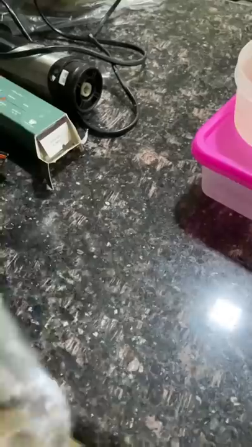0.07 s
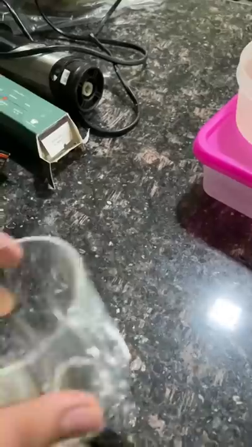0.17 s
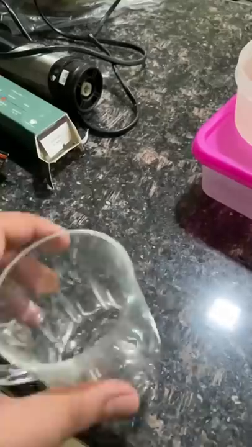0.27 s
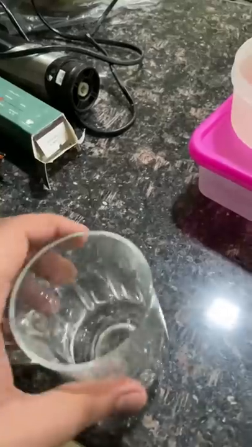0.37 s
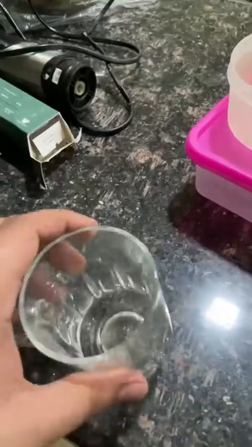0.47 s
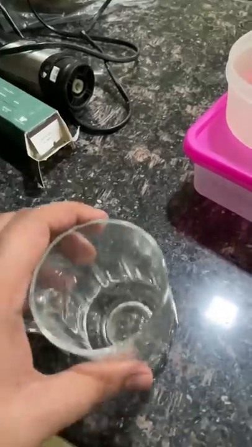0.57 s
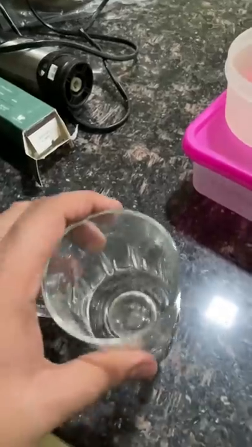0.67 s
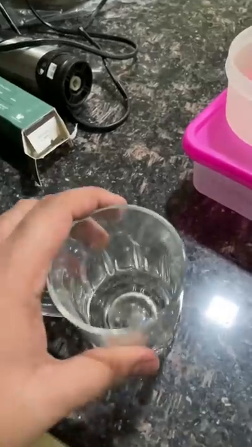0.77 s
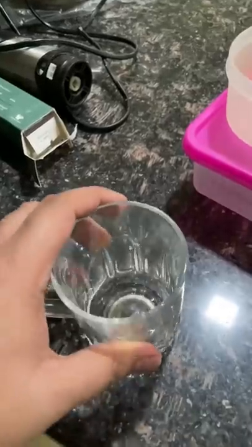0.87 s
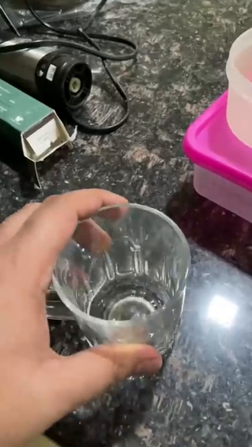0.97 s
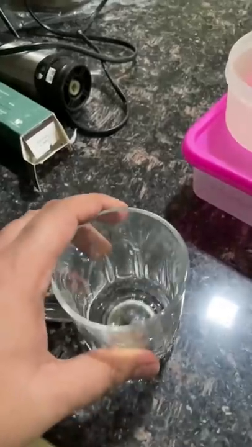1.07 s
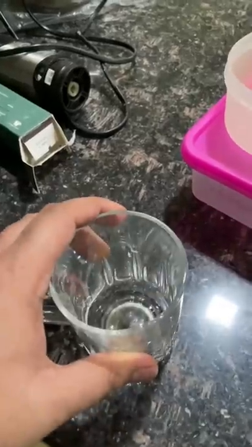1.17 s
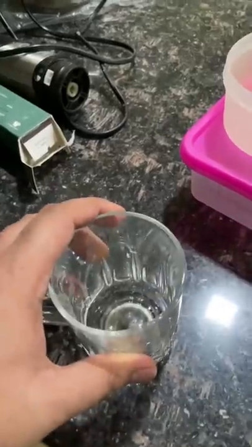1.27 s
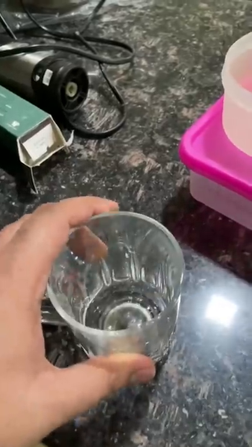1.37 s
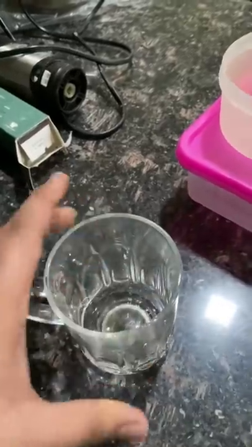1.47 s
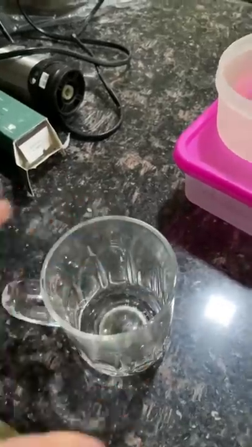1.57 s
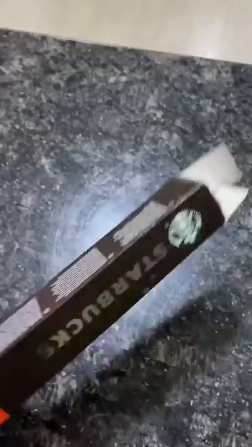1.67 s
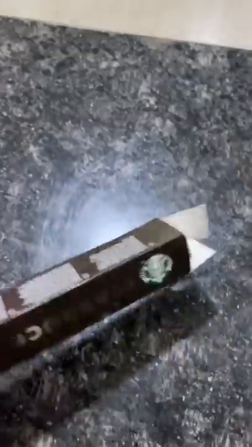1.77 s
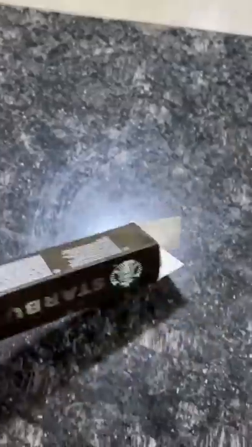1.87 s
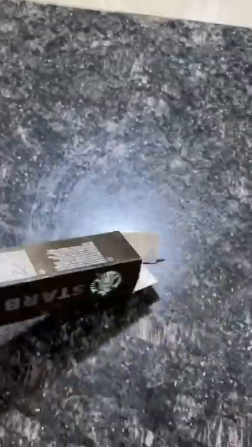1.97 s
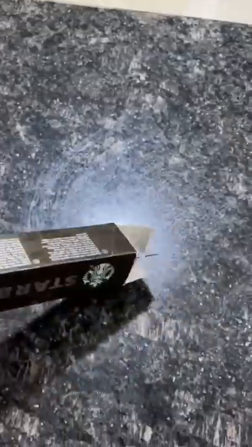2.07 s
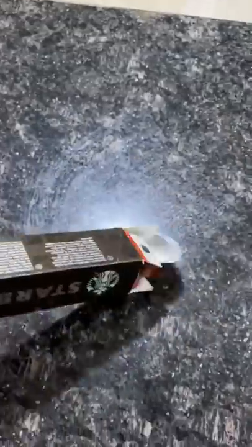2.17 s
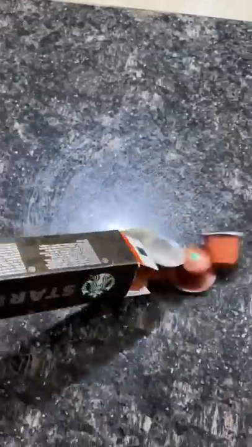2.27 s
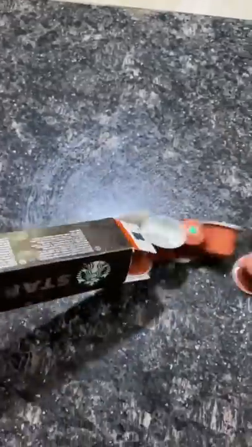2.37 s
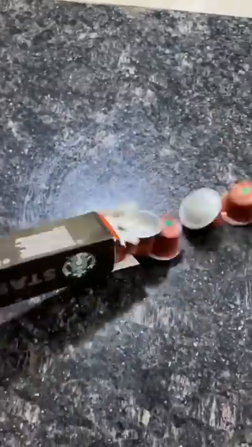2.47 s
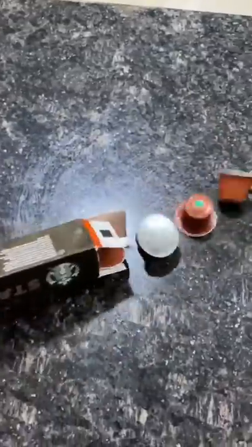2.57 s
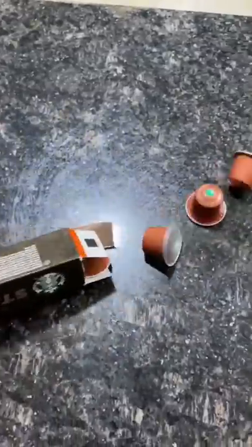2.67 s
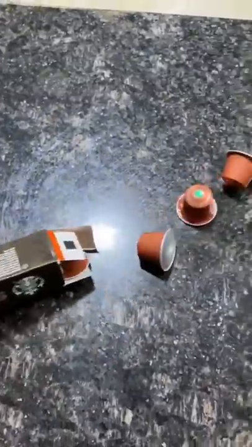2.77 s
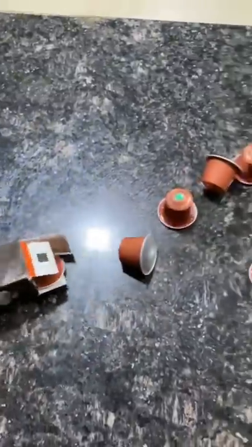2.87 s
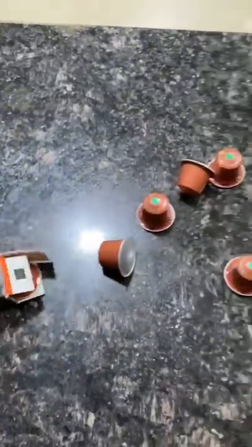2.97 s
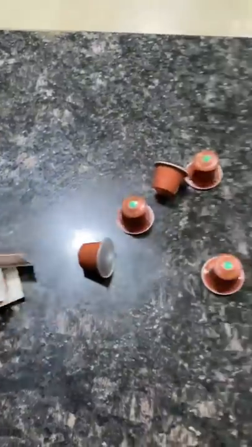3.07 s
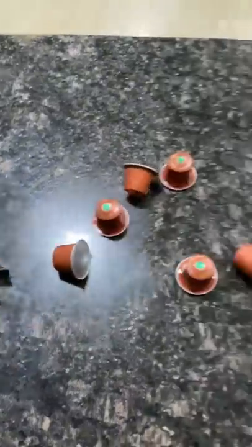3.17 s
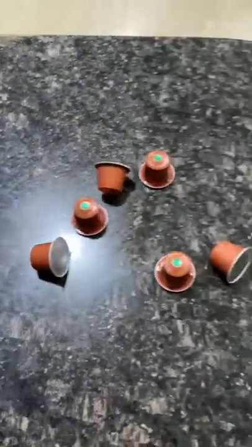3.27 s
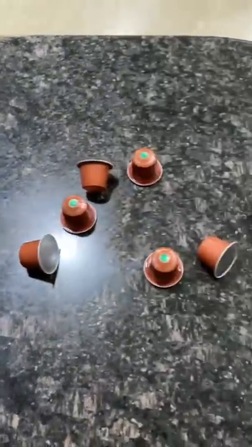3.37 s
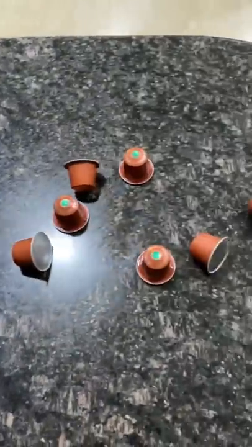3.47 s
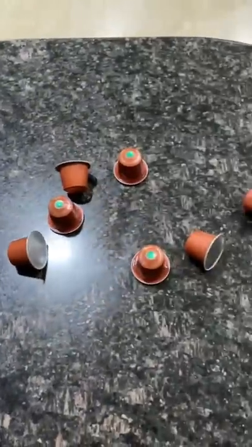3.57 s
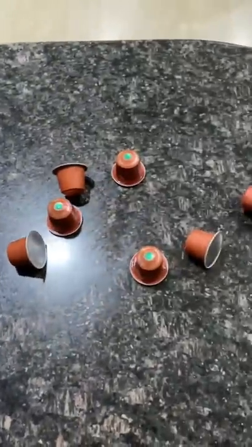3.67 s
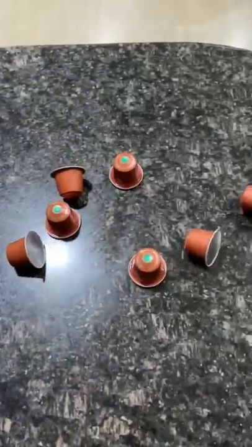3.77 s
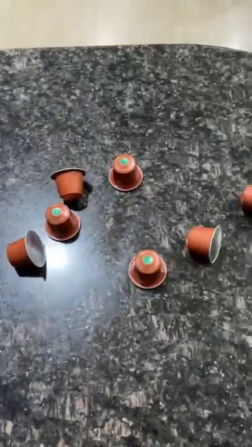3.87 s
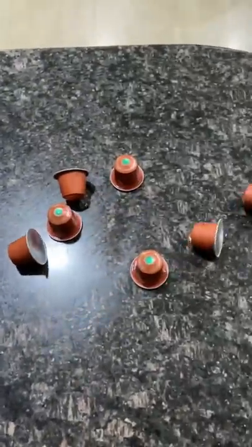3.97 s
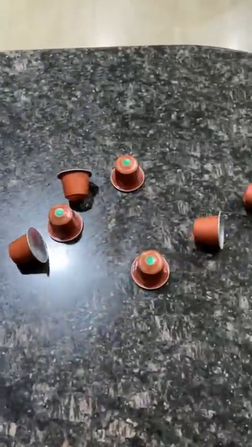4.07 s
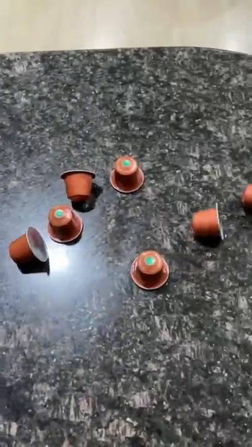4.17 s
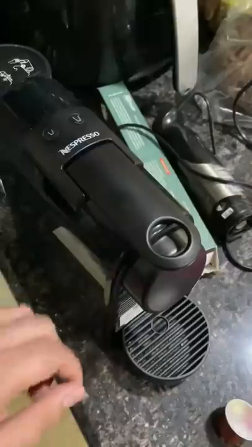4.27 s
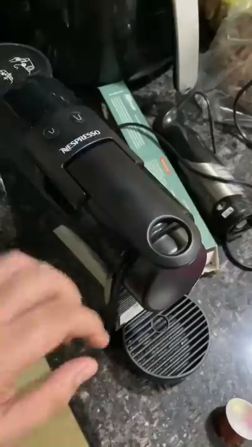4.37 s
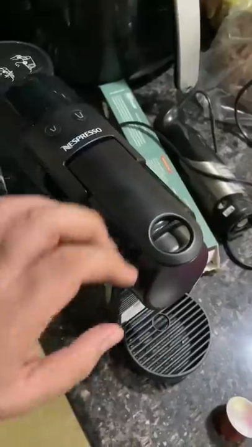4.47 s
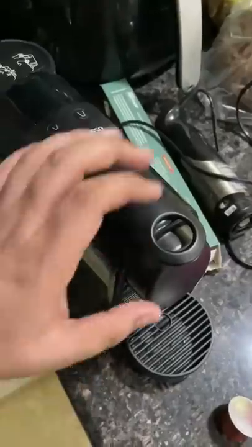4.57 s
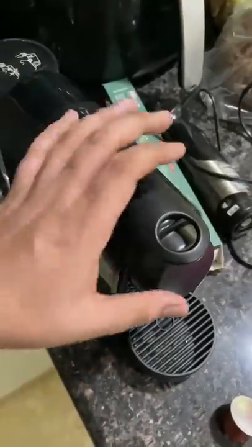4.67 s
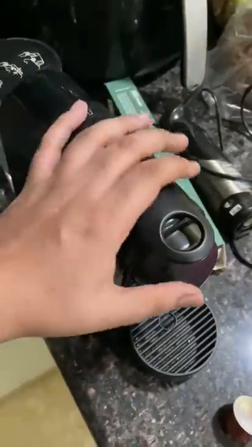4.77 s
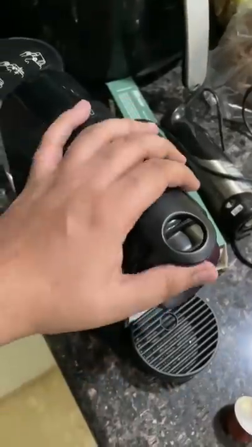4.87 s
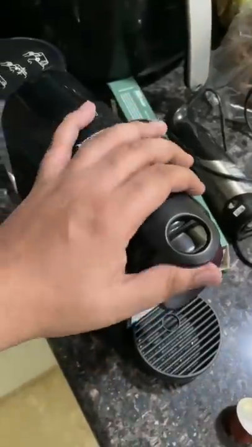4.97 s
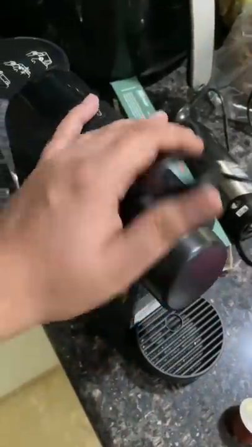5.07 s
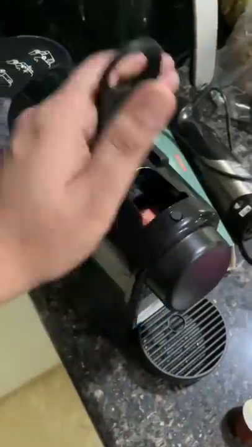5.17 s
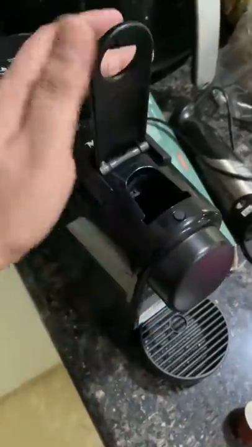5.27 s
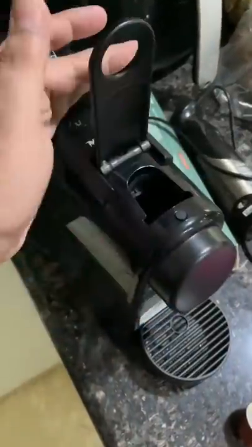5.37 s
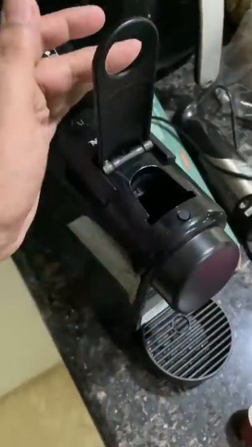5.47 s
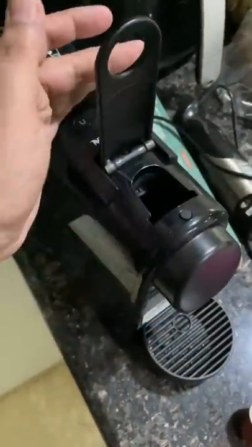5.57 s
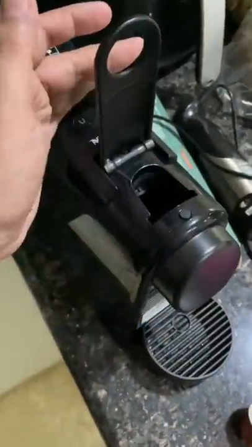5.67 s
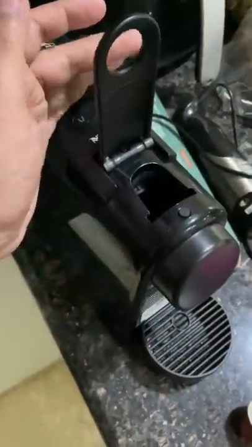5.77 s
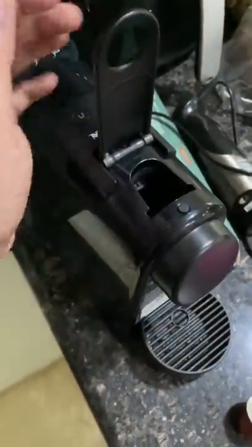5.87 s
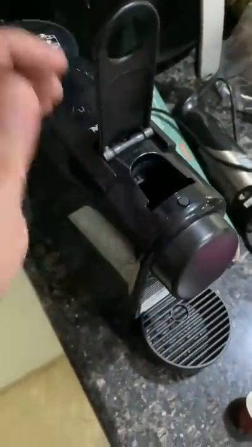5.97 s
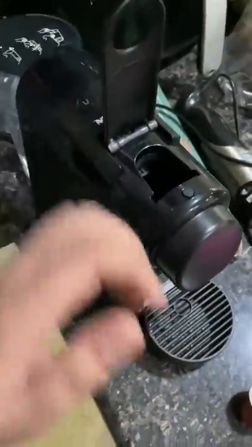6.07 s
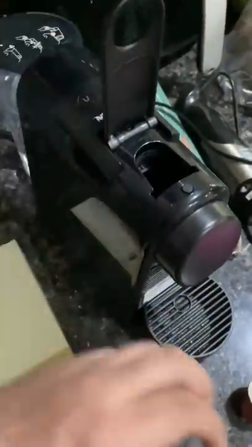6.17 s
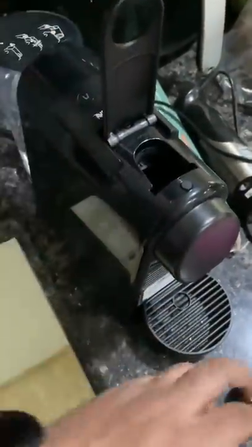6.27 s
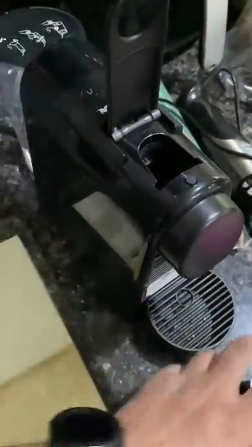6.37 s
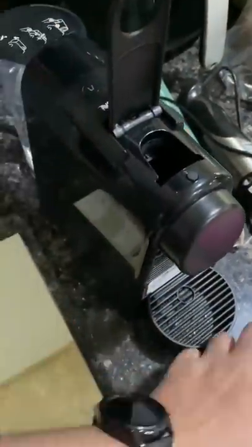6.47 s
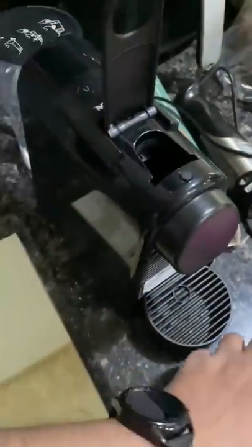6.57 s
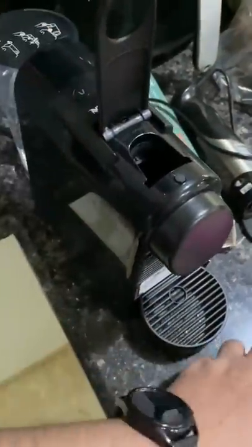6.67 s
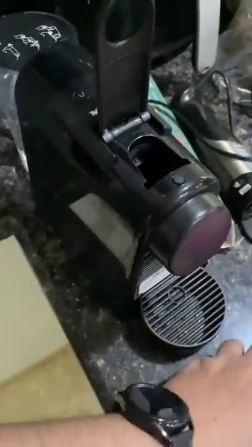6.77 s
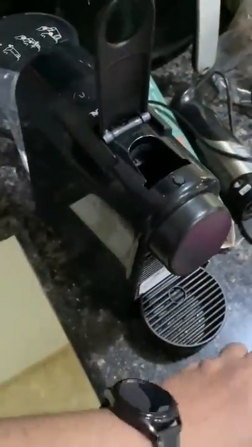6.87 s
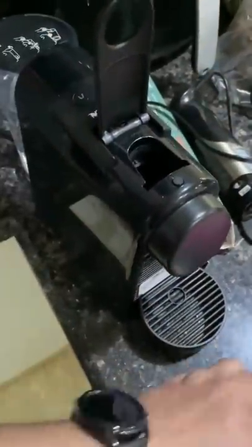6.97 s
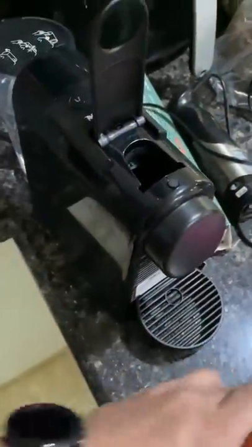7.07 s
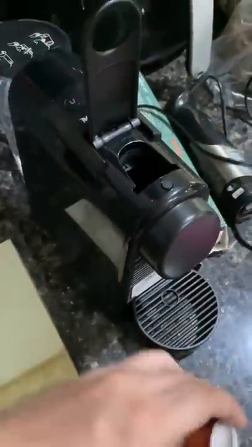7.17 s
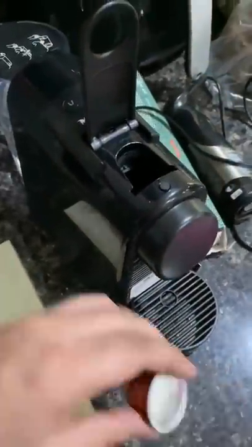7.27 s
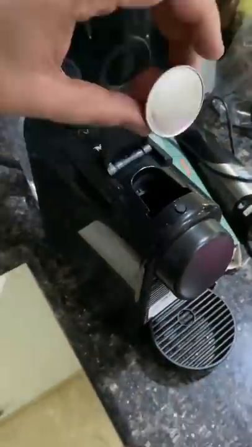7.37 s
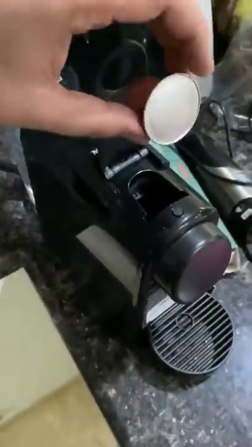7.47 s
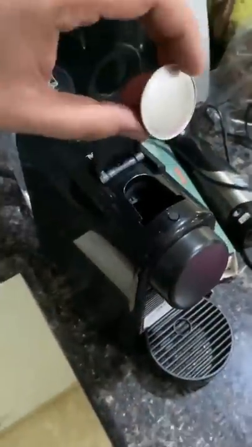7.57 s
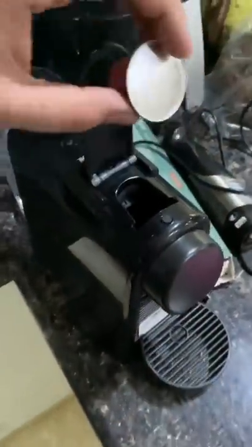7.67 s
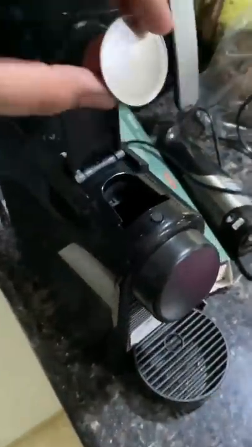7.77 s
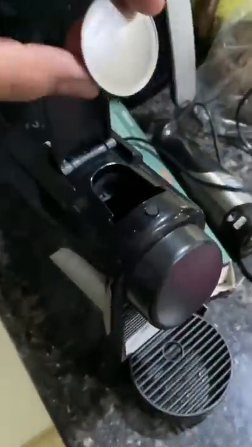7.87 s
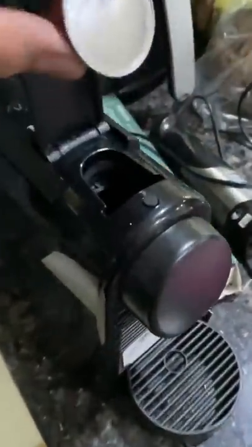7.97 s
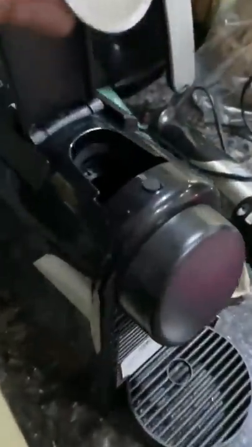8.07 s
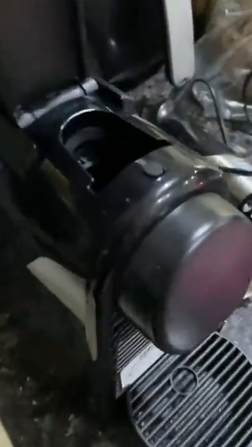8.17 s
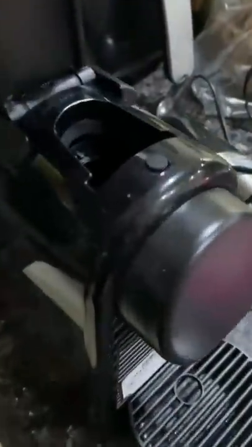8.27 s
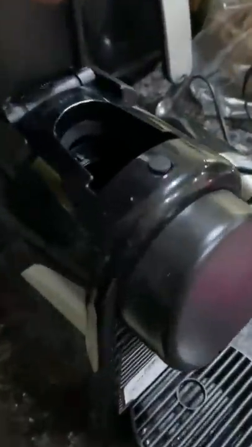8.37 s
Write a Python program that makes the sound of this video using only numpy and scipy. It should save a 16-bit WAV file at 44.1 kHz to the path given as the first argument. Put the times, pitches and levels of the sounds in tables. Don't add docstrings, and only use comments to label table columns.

```python
import sys
import numpy as np
from scipy import signal
from scipy.fft import rfft, irfft, next_fast_len
from scipy.io import wavfile

SR = 44100
rng = np.random.default_rng(int(sys.argv[2]) if len(sys.argv) > 2 else 0)


def generate_wav(signal):
    frames = np.transpose(np.atleast_2d(signal))
    scaled = np.clip(frames, -1, 1) * 32767
    pcm = np.round(scaled).astype(np.int16)
    wavfile.write(sys.argv[1], SR, pcm)


def volts_from_db(level):
    exponent = np.asarray(level, float) / 20
    return 10 ** exponent


N = 371322
TIME = np.arange(N) / SR
PAD = next_fast_len(N + SR)
HZ = np.maximum(np.arange(PAD // 2 + 1) * SR / PAD, 1)


def rms_one(x):
    return x / np.sqrt(np.mean(x ** 2) + 1e-20)


def at_hz(points, column=1):
    points = np.array(points)
    return np.interp(np.log(HZ), np.log(points[:, 0]), points[:, column])


def band(x, low_hz, high_hz):
    return signal.sosfilt(signal.butter(2, [low_hz, high_hz], "band", fs=SR, output="sos"), x)


def ring(clicks, hz, t60):
    r, w = volts_from_db(-60 / (t60 * SR)), 2 * np.pi * hz / SR
    return signal.lfilter([0, np.sin(w)], [1, -2 * r * np.cos(w), r * r], clicks + 1e-18)


def body(x, peaks):
    total = 0
    for k, (hz, wide, db) in enumerate(peaks):
        total = total + (-1) ** k * volts_from_db(db) * np.sqrt(wide) * ring(x, hz, 2.2 / wide)
    return rms_one(total)


def grit(per_s, spread_db):
    sizes = volts_from_db(spread_db * np.minimum(rng.exponential(1, N), 4)) * rng.standard_normal(N)
    return rms_one(sizes * (rng.random(N) < per_s / SR))


def blow_shape(db, t60, rise):
    t = np.arange(SR // 5) / SR
    return volts_from_db(db - 60 * t / max(t60, .002)) * (1 - np.exp(-t / rise))


def dying(s, db, t60, rise=0.00024):
    out = np.zeros(N + SR)
    for at, level_db, fall, up in np.broadcast(s, db, t60, rise):
        out[round(at * SR):][:SR // 5] += blow_shape(level_db, fall, up)
    return out[:N]


def knocks(s, db, hz, t60, rise=.0001):
    out, t = np.zeros(N + SR), np.arange(SR // 5) / SR
    for at, level_db, pitch, fall, up in np.broadcast(s, db, hz, t60, rise):
        out[round(at * SR):][:len(t)] += blow_shape(level_db, fall, up) * np.sin(2 * np.pi * pitch * t)
    return out[:N]


def stroke(s, length, db_per_s):
    out, near = np.zeros(N), slice(max(round((s - .4) * SR), 0), round((s + length + .6) * SR))
    rise, fall = (s - TIME[near]) * db_per_s[0], (TIME[near] - s - length) * db_per_s[1]
    out[near] = volts_from_db(-np.maximum(np.maximum(rise, fall), 0))
    return out


def contact(db, bright_db, rasp_db):
    return volts_from_db(np.array([db - bright_db, db + rasp_db - np.abs(bright_db), db + bright_db]))


def strokes(rows, db_per_s, rasp_db):
    out = np.zeros((3, N))
    for s, length, db, bright_db in rows:
        out += contact(db, bright_db, rasp_db)[:, None] * stroke(s, length, db_per_s)
    return out


def rub(gains, resonances, per_s, top_db, lumpy_db):
    low, rasp, hiss = gains
    grains = grit(per_s, spread_db=-2.0)
    grains = grains * volts_from_db(lumpy_db * rms_one(band(grains[::-1], 15, 90)))
    fine = rms_one(band(grains, 5000, 8000)) + volts_from_db(top_db) * rms_one(band(grains, 8000, 16500))
    hollow = rms_one(band(grit(per_s, spread_db=3.5), 320, 1100))
    return low * hollow + rasp * body(grains, resonances) + hiss * fine


def bumps(rows):
    return sum(db * np.exp(-((TIME - s) / half) ** 2) for s, half, db in rows)


# frequency in Hz, level in dB per Hz.
RUMBLE_COLOUR = [(15, -38), (25, -16.5), (43, 1), (70, -10), (97, -3), (129, -6), (165, -3), (195, -3.5),
                 (257, -6), (290, -12), (368, -7.5), (444, -15), (484, -6.5), (626, -17), (1500, -42.5),
                 (1950, -69.5), (3300, -120)]
RUMBLE_DB = (-53.5, -51.5, -53)
# frequency in Hz, level in dB per Hz.
AIR_COLOUR = [(900, 0), (1500, -6), (2150, 1), (2900, -8), (4500, -11), (6200, -9), (7500, -18),
              (13000, -20), (16000, -28)]
AIR_DB = (-83.5, -83.5, -86)
# frequency in Hz, level in dB rms.
MOTOR_HUM = [(50, -68.5), (100, -64.5), (258, -67), (377, -84.5), (492, -78), (2100, -96)]
# frequency in Hz, level in dB rms.
COMPRESSOR = (160, -55.5)
COMPRESSOR_S = (1.71, 4.22)
# start in seconds, frequency in Hz, level in dB rms.
CHARGER = (7.7, 12560, -99)
# middle in seconds, half width in seconds, change in dB.
SWELLS = [
    (.85, 0.29, 4),
    (4.62, 0.25, 4.5),
    (6.7, 0.27, 4.5),
    (7.9, 0.23, -6),
    (8.4, 0.17, 2.5),
]
# start in seconds, length in seconds, level in dB.
SWAY = (8.05, .25, -53)
# middle in seconds, half width in seconds, change in dB.
CUTS = [
    (4.23, .01, -8),
    (6.19, .015, -10),
    (7.59, .025, -10),
]


def background():
    noise = rng.standard_normal((3, PAD))
    shot = np.searchsorted(COMPRESSOR_S, TIME)
    shared, *own = irfft(volts_from_db(at_hz(RUMBLE_COLOUR)) * rfft(noise), PAD)[:, :N]
    flicker = volts_from_db(1.8 * rms_one(band(noise[1, :N], 1.3, 13)))
    level = volts_from_db(np.take(RUMBLE_DB, shot) - 6.5 + bumps(SWELLS)) * flicker

    hum = sum(volts_from_db(db) * rms_one(ring(noise[2, :N], hz, 1.0)) for hz, db in MOTOR_HUM)
    hz, db = COMPRESSOR
    running = (TIME > COMPRESSOR_S[0]) * (TIME < COMPRESSOR_S[1])
    waver_db = 1.7 * rms_one(band(noise[0, :N], 0.83, 21))
    hum += volts_from_db(db + 3 + waver_db) * np.sin(2 * np.pi * hz * TIME) * running
    start_s, hz, db = CHARGER
    hum += volts_from_db(db + 3) * np.sin(2 * np.pi * hz * TIME) * stroke(start_s, 1, db_per_s=(100, 100))

    hiss = rms_one(irfft(volts_from_db(at_hz(AIR_COLOUR)) * (HZ > 800) * rfft(noise[1:]), PAD)[:, :N])
    air = volts_from_db(np.take(AIR_DB, shot) + 1.5 * rms_one(band(noise[2, :N], 1.0, 8.5))) * hiss
    apart = 0.48 * level * rms_one(np.array(own))
    s, length, db = SWAY
    apart += volts_from_db(db) * stroke(s, length, db_per_s=(60, 90)) * rms_one(band(noise[:2, :N], 30, 70))
    dip = volts_from_db(bumps(CUTS))
    return dip * (level * rms_one(shared) + hum), dip * apart + air


# start in seconds, length in seconds, level in dB, brightness in dB.
BRUSHES = [
    (4.7, 0.16, -79.5, 0.5),
    (5.02, 0.011, -77.5, 4),
    (6.39, 0.29, -77.5, -2),
    (7.26, 0.053, -99.5, 12),
    (7.75, 0.061, -100.5, 11.5),
    (7.87, 0.13, -84, 2.5),
]
# start in seconds, grind length in seconds, grind level in dB,
# scrape level in dB.
LEVER_GRIND = [
    (5.082, 0.012, -33.5, -33.5),
    (5.197, 0.047, -36, -31),
    (5.377, 0.008, -36.5, -42),
]
# frequency in Hz, width in Hz, level in dB.
SHELL = [(1161, 220, 12.5), (1342, 160, -18), (1895, 550, -4.5), (2708, 100, -2.5), (3388, 910, -2)]


def handling():
    gains = strokes(BRUSHES, db_per_s=(168, 249), rasp_db=4.5)
    for s, length, grind_db, scrape_db in LEVER_GRIND:
        parts_db = np.c_[[0, -10, -27]]
        gains += volts_from_db(grind_db + parts_db) * stroke(s, length, db_per_s=(1200, 300))
        scrape = stroke(s, 0.0046, db_per_s=(2500, 1100))
        gains[1:] += volts_from_db(scrape_db + np.array([[0], [-9.5]])) * scrape
    return rub(gains, SHELL, 5000, top_db=0, lumpy_db=2.0)


# start in seconds, peak in dB, housing tone in Hz, shell level in dB, shell tone in Hz.
LEVER = [(4.981, -53.5, 589, -49, 2280), (5.04, -32, 430, -36, 1240), (5.06, -22, 425, -21.5, 1380),
         (5.076, -21, 512, -28.5, 1500), (5.085, -17.5, 540, -30.5, 1590), (5.091, -26, 500, -34.5, 1100),
         (5.118, -25, 440, -42, 985), (5.131, -29, 440, -38, 1120), (5.171, -30.5, 611, -62, 1040),
         (5.186, -35, 390, -31.5, 1340), (5.201, -17, 618, -26.5, 1344), (5.208, -20, 640, -28.5, 1100),
         (5.216, -23.5, 600, -36.5, 1400), (5.24, -20, 443, -32, 1618), (5.253, -32, 380, -54, 1170),
         (5.27, -19, 635, -20.5, 1050), (5.285, -9, 605, -30.5, 2076), (5.307, -20.5, 620, -46, 1570),
         (5.337, -21, 603, -35, 1280), (5.362, -17, 640, -43, 1270), (5.381, -26.5, 554, -27, 1980),
         (5.385, -32, 550, -28, 1160), (5.411, -21, 588, -21.5, 1074)]
# start in seconds, peak in dB.
TEETH = [(4.8933, -56), (4.9818, -47), (5.033, -35), (5.0698, -39), (5.074, -27), (5.0838, -31),
         (5.1731, -29), (5.2004, -21.5), (5.2355, -27.5), (5.2664, -28), (5.3592, -35), (5.3807, -36),
         (5.4091, -37.5)]
# frequency in Hz, level in dB, time to fall 60 dB in seconds.
ARM = [(2650, -0.5, .014), (3610, -5, 0.0066)]
# start in seconds, peak in dB.
ARM_HITS = [(5.063, -46), (5.086, -31), (5.186, -30), (5.202, -32), (5.27, -37), (5.286, -26.5),
            (5.337, -37), (5.362, -27), (5.382, -39), (5.412, -48)]


def lever():
    s, db, hz, shell_db, shell_hz = np.transpose(LEVER)
    chatter = grit(7000, spread_db=2.5)
    boom = knocks(s, db + 7.5, hz, 0.019, rise=0.0031)
    boom += knocks(s, db - 15.5, .72 * hz, 0.068, rise=0.0075)

    shell = knocks(s, shell_db + 6.0, shell_hz, 0.013, rise=0.0012)
    shell += knocks(s, shell_db, 1.79 * shell_hz, 0.0067, rise=0.0026)
    shell += dying(s, shell_db - 3, 0.026, rise=0.002) * body(chatter, SHELL)
    for at, hit_db in ARM_HITS:
        for mode_hz, mode_db, t60 in ARM:
            shell += knocks(at, hit_db + mode_db, mode_hz, t60, rise=0.0018)

    snap_db = -31.5 + 0.63 * shell_db
    snap = rms_one(band(chatter, 5000, 10300)) + volts_from_db(-5.5) * rms_one(band(chatter, 9000, 11460))
    tooth_s, tooth_db = np.transpose(TEETH)
    click = snap + volts_from_db(-7.0) * rms_one(band(chatter, 1300, 4440))
    click = click + volts_from_db(-3.0) * rms_one(band(chatter, 11000, 16000))
    teeth = dying(tooth_s - .001, tooth_db, .016, rise=0.0005) * click
    return boom + shell + dying(s, snap_db + 5, 0.034, rise=0.0016) * snap + teeth


# time in seconds, flow level in dB, brightness in dB.
SPILL = [(1.71, -69.5, -17.5), (1.762, -63.5, -6.5), (1.881, -62, -5), (1.99, -54, -1), (2.218, -42, 1),
         (2.319, -42.5, 1.35), (2.5, -44, 4.5), (2.585, -54, 6), (2.722, -51.5, 5)]
# start in seconds, length in seconds, level in dB, brightness in dB.
SLEEVE_OFF = [
    (2.73, 0.081, -61, 4),
    (2.95, 0.0064, -67.5, -5.5),
    (3.01, 0.096, -63.5, -0.8),
]
# frequency in Hz, width in Hz, level in dB.
CARD = [(1100, 400, -1), (1680, 400, 4), (2400, 1000, 0.5), (3500, 350, -7), (4270, 400, -3.5)]


def spill():
    s, db, bright_db = np.transpose(SPILL)
    flow_db = np.interp(TIME, s, db, left=-150, right=-150)
    flow = contact(flow_db, np.interp(TIME, s, bright_db), rasp_db=1.0)
    sleeve = strokes(SLEEVE_OFF, db_per_s=(200, 200), rasp_db=-4.0)
    return rub(flow + sleeve, CARD, 3000, top_db=-3.5, lumpy_db=1.5)


# start in seconds, length in seconds, level in dB, brightness in dB.
SCUFFS = [
    (6.364, .004, -89, -5.5),
    (6.695, 0.037, -68.5, 11),
    (6.745, 0.0011, -56, 6.5),
    (7.347, 0.0018, -100, 4),
]


def nail_scuffs():
    gains = strokes(SCUFFS, db_per_s=(3500, 2500), rasp_db=11.5)
    return rub(gains, CARD, 6000, top_db=-7.5, lumpy_db=5.0)


# start in seconds, peak in dB, cup tone in Hz, foil level in dB.
TUMBLE = [(1.712, -31.5, 1380, -57), (1.723, -35.5, 1630, -55), (1.839, -32.5, 790, -55),
          (2.014, -31.5, 1810, -50), (2.067, -15, 1670, -42.5), (2.085, -26.5, 1450, -46),
          (2.156, -36, 990, -36.5), (2.186, -31.5, 1610, -32), (2.202, -17.5, 2290, -35),
          (2.218, -5, 2890, -29), (2.243, -25.5, 1100, -34.5), (2.251, -28.5, 1030, -37),
          (2.278, -21.5, 2847, -26.5), (2.287, -10, 3080, -22), (2.298, -20.5, 2410, -35),
          (2.315, -2, 2730, -27), (2.351, -26.5, 3600, -28), (2.354, -3.5, 3640, -19.5),
          (2.367, -23.5, 2400, -26.5), (2.418, -3.5, 2420, -31.5), (2.46, -32.5, 880, -36),
          (2.49, -18, 3070, -37.5), (2.497, -30, 1590, -40), (2.527, -3, 2388, -25.5),
          (2.609, -6.5, 4300, -17), (2.648, -27.5, 910, -41), (2.682, -5, 4230, -25.5)]
# start in seconds, peak in dB, cup tone in Hz, foil in dB.
ROCKING = [(2.742, -45.5, 4260, -50), (2.761, -39, 4520, -55), (2.799, -52.5, 4460, -58),
           (2.874, -45, 885, -64), (2.941, -34, 1420, -67), (2.953, -35.5, 1060, -60),
           (3.023, -51.5, 860, -71), (3.114, -48, 934, -64.5), (3.052, -60, 2300, -69),
           (3.205, -73, 817, -84), (3.557, -85, 2000, -82), (3.571, -92, 2000, -69),
           (3.794, -80, 2000, -83), (3.845, -76.5, 2000, -84)]
# start in seconds, peak in dB, cup tone in Hz, foil level in dB.
PICKED = [
    (6.364, -47.5, 1810, -60),
    (6.693, -42, 2820, -66),
    (6.703, -35.5, 3610, -50.5),
    (6.746, -30, 3860, -50),
    (6.753, -13, 3930, -22.5),
    (7.35, -64, 2500, -85),
]
TICK_DB = (-11, 6.5, -21)
# start in seconds, peak in dB, tone in Hz, fall by 60 dB in seconds.
THUDS = [
    (1.043, -49, 2580, 0.042),
    (1.838, -28.5, 750, 0.03),
    (2.94, -22, 329, 0.03),
    (4.092, -51, 975, 0.022),
    (4.894, -32, 910, 0.015),
    (4.9, -40, 590, 0.026),
]


def capsules():
    s, db, hz, foil_db = np.transpose(TUMBLE + ROCKING + PICKED)
    over_db = np.repeat(TICK_DB, [len(TUMBLE), len(ROCKING), len(PICKED)])
    tick_db = foil_db + over_db + .15 * (db - foil_db - 14.5)
    white, t60 = rng.standard_normal(N), 0.011
    short = t60 * (1500 / hz) ** 1.8
    soft = (hz < 1900) * (s < ROCKING[0][0])
    rise, lift_db = 0.00013 + 0.0013 * soft, 4.1 * soft
    long = t60 * (1 + 1.2 * soft)

    cup = knocks(s, db - 4.5 + .4 * lift_db, hz, short * (1 - .3 * soft), .5 * rise)
    cup += knocks(s, db - 9.0, 1.3 * hz, 0.52 * short, .5 * rise)
    rattle = dying(s, db - 19.5 + lift_db, 0.79 * long, rise) * rms_one(band(white, 2700, 4200))
    shiver = rms_one(band(band(white, 4900, 6900), 2800, 7000))
    foil = dying(s, foil_db + lift_db, 1.4 * long, rise) * shiver
    foil_hz = 5720 + 50 * rng.standard_normal(len(s))
    foil += knocks(s, foil_db + 3.5 + lift_db, foil_hz, 0.82 * long, .5 * rise)
    tick = dying(s, tick_db + 13.5 + lift_db, .55 * long, rise) * rms_one(band(white, 10000, 14500))

    s, db, hz, t60 = np.transpose(THUDS)
    hollow = knocks(s, db, hz, t60, rise=.002)
    hollow += dying(s, db - 14, .7 * t60, rise=.0015) * rms_one(band(band(white, 600, 1800), 500, 2000))
    return cup + rattle + foil + tick + hollow


# start in seconds, peak in dB, glass ring in dB, slab clatter in dB,
# time for the clatter to fall 60 dB in seconds.
SET_DOWN = [
    (0.547, -10.5, -21, -55, 0.027),
    (0.561, -9, -19.5, -40.5, 0.27),
    (0.898, -28.5, -37, -39.5, 0.09),
    (0.912, -16, -22.5, -33, 0.06),
    (1.397, -50, -97, -80, 0.025),
    (1.42, -61, -74, -92.5, 0.033),
    (1.587, -62, -126, -76, 0.02),
]
# start in seconds, length in seconds, stone, glass and rim levels in dB.
DRAG = [
    (0.553, 0.15, -54.5, -80.5, -68),
    (0.768, 0.1, -77, -96, -69),
    (0.899, 0.13, -55.5, -82, -101),
    (1.098, 0.16, -70.5, -92, -93),
    (1.367, 0.037, -79.5, -76.5, -77),
]
# frequency in Hz, level in dB, fall by 60 dB in seconds.
COUNTER = [(133.7, -9.5, 0.26), (240, -5.5, 0.22), (329, -8.5, 0.34), (386, -3, 0.22), (453, -10.5, 0.39),
           (566, -13, 0.3), (678, -5.5, 0.099), (840, -12.5, 0.05), (903, 6, 0.034), (1400, -13, 0.1),
           (1640, -2, 0.031), (2017, -9.5, 0.07)]
# frequency in Hz, level in dB, fall by 60 dB in seconds.
SETTLED = [(250, -16.5, 0.54), (437, -13.5, 0.25), (945, -5, 0.24), (985, 4, 0.093), (1197.7, -2.5, 0.26),
           (1333, -6.5, 0.57), (1570, -22, 0.36), (2050, -12.5, 0.093)]
# frequency in Hz, level in dB, fall by 60 dB in seconds.
BOWL = [(2580, -18.5, 0.22), (2764, -7, 0.22), (3030, -30.5, 0.095), (3480, -25.5, 0.05),
        (3660, -31, 0.089), (4040, -36.5, 0.041), (5070, -42, .06), (6240, -30.5, 0.076)]
# frequency in Hz, level in dB, fall by 60 dB in seconds.
RIM = [(6296, -8, 0.0469), (8030, -1, 0.056), (14920, 2.5, 0.056), (15700, 6.5, .05)]


def glass():
    s, stone_db, ring_db, clatter_db, t60 = np.transpose(SET_DOWN)
    rim_db = -51.5 + 0.28 * ring_db
    scrape, sing, whine = np.zeros((3, N))
    for start_s, length, scrape_db, sing_db, whine_db in DRAG:
        scrape += volts_from_db(scrape_db) * stroke(start_s, length, db_per_s=(606.5, 131))
        ringing = stroke(start_s, length, db_per_s=(606.5, 246.5))
        sing += volts_from_db(sing_db) * ringing
        whine += volts_from_db(whine_db) * ringing

    at, out = np.round(s * SR).astype(int), np.zeros((2, N))
    late = 99 * (s > .8)
    rough, span = grit(4000, spread_db=-2.0), slice(0, 2 * SR)
    parts = ((COUNTER, stone_db - 14 - late, 0.19 * scrape), (SETTLED, stone_db - 111 + late, scrape),
             (BOWL, ring_db + 4.0, .7 * sing), (RIM, rim_db + 8.0, whine))
    for modes, blow_db, drag in parts:
        for hz, db, ring_s in modes:
            force = .035 * drag * rough
            force[at] += volts_from_db(blow_db + 0.48 * rng.standard_normal(len(at)))
            soft = band(force[span], hz / 1.8, min(hz * 2.0, 20000))
            out[int(modes is BOWL), span] += volts_from_db(db) * ring(soft, hz, 0.53 * ring_s)

    thud = knocks(s, stone_db + .1, 880, 0.0047, rise=0.00083)
    stone = rms_one(band(rough, 930, 1600)) + volts_from_db(-7.5) * rms_one(band(rough, 1200, 3000))
    stone = stone + volts_from_db(-29) * rms_one(band(rough, 2100, 4600))
    out[1] += sing * rms_one(ring(rough, BOWL[1][0], 0.12))

    white = rng.standard_normal(N)
    clatter = rms_one(band(white, 300, 1800)) + volts_from_db(-30.5) * rms_one(band(white, 2600, 3000))
    clatter = clatter + volts_from_db(-20.5) * rms_one(band(white, 2500, 4300)) + volts_from_db(-31) * band(white, 5500, 8000)
    clatter = dying(s, clatter_db + 0.077, t60, rise=0.0013) * clatter
    return out[0] + thud + scrape * stone + clatter, out[1]


def placed(x, lead, pan_db):
    turn = np.exp(.5j * at_hz(lead) * np.array([[1], [-1]]))
    return irfft(rfft(x, PAD) * turn, PAD)[:, :N] * volts_from_db(pan_db * np.array([[.5], [-.5]]))


# frequency in Hz, time to fall 60 dB in seconds, level in dB.
ROOM = [(157, 0.64, -4), (450, 0.6, -10), (1100, 0.31, -10.5), (2400, 0.37, -14), (4300, 0.57, -14),
        (7500, 0.11, -19.5), (14010, .3, -24)]


def room(sent):
    t, tail = np.arange(SR) / SR, 0
    for (hz, t60, db), white in zip(ROOM, rng.standard_normal((len(ROOM), 3, SR))):
        alike = 700 / hz
        part = band(white[:2] + alike * white[2], hz / 1.476, min(hz * 1.686, 20000))
        part = part * volts_from_db(-60 * t / t60) / (1 + alike)
        tail = tail + volts_from_db(db - 29.5) * part * (1 - np.exp(-t / 0.002))
    return irfft(sent * rfft(tail, PAD), PAD)[:, :N]


# frequency in Hz, lead in radians.
GLASS_SIDE = [(50, 0), (250, -.15), (600, -.4), (900, -1.), (1150, -2.5), (1600, .4), (2900, 2.9),
              (4000, -1.)]
# frequency in Hz, lead in radians.
SPILL_SIDE = [(50, 0), (200, 0.052), (600, -1.1), (1300, -1.3), (2400, 1), (3600, -0.23), (4500, 0.72)]
# frequency in Hz, lead in radians.
MACHINE_SIDE = [(50, -.1), (170, -.25), (350, -.6), (650, -1.7), (1000, -2.4), (1200, -3.8), (1450, -5.3),
                (2300, -5.7), (2700, -4.2), (3500, -5.3)]
PAN_DB = (3.5, 1.5, -0.52)
# frequency in Hz, level in dB.
GLASS_SEND = [(200, 1), (1000, 2), (1400, 6.5), (3000, 10), (4000, 7.5), (4800, 2), (8000, -12)]
# frequency in Hz, level in dB.
SPILL_SEND = [(300, 0), (1000, -0.5), (3000, -0.5), (4900, -1.492), (5700, 0.9), (7000, -0.5), (13000, 0)]
# frequency in Hz, level in dB.
MACHINE_SEND = [(300, -2), (480, -8), (700, -11), (1100, -3), (2000, 1), (3700, 5), (5200, -1), (5850, 7)]


def scene():
    far, diffuse = background()
    near = handling() + lever() + spill() + nail_scuffs() + capsules()
    slab, bowl = glass()
    early = TIME < CUTS[0][0]
    direct = placed(slab + bowl, GLASS_SIDE, PAN_DB[0])
    direct += placed((near + far) * early, SPILL_SIDE, PAN_DB[1])
    direct += placed((near + far) * ~early, MACHINE_SIDE, PAN_DB[2])
    glass_out = slab + volts_from_db(-11) * bowl
    sends = (glass_out, GLASS_SEND), (near * early, SPILL_SEND), (near * ~early, MACHINE_SEND)
    return direct + diffuse + room(sum(rfft(x, PAD) * volts_from_db(at_hz(send)) for x, send in sends))


def low_pass(x):
    return signal.sosfilt(signal.butter(12, 16990, fs=SR, output="sos"), x)


# frequency in Hz, level in dB.
PORT = [(20, -30), (45, 1), (4300, 9), (4900, 4.5), (5700, 5.5), (6600, -1.5), (9000, 6.5), (13000, 5.5),
        (16000, -6), (16900, -26)]
# frequency in Hz, phase twist in radians.
TWIST = [(5200, -.3), (6900, 1.3), (8000, 2.1), (9200, 3.0), (11300, 3.4), (12500, 4.5), (14300, 6.1),
         (16000, 6.3)]


def record(dry):
    start_s, split_hz = .037, 5600
    both = rfft(dry * (TIME > start_s), PAD)
    upper = 1 / (1 + (split_hz / HZ) ** 24)
    single = both[0] * np.exp(.5j * at_hz(TWIST) * np.array([[1], [-1]])) + .22 * both
    x = irfft(volts_from_db(at_hz(PORT)) * ((1 - upper) * both + upper * single), PAD)[:, :N]
    x = 1.05 * np.tanh(x / 1.05)
    return low_pass(x)


dry = scene()
out = record(dry)
generate_wav(out)
```